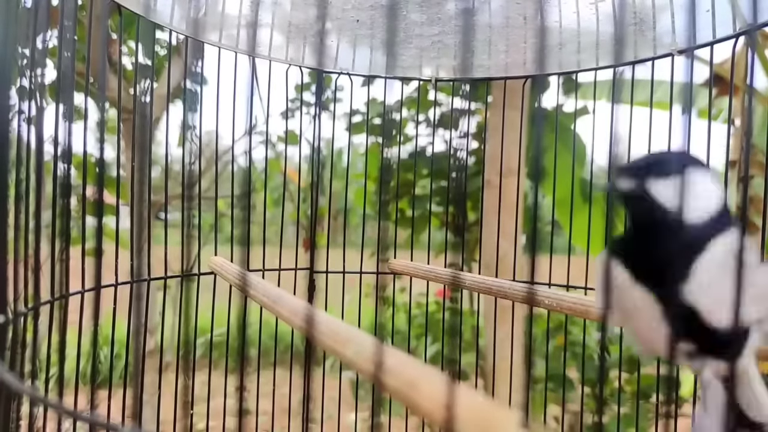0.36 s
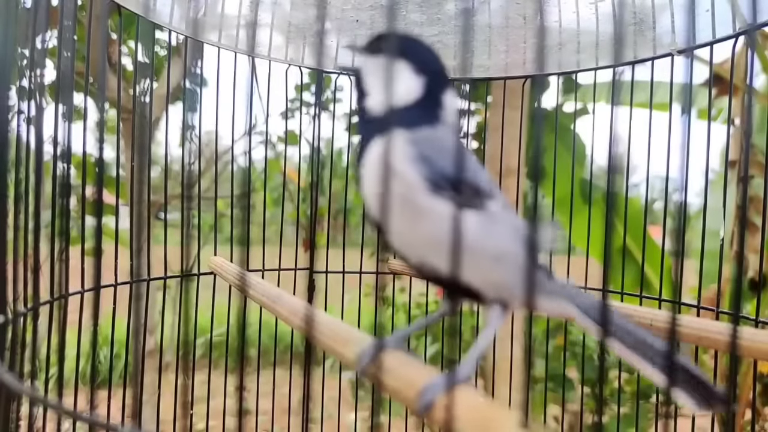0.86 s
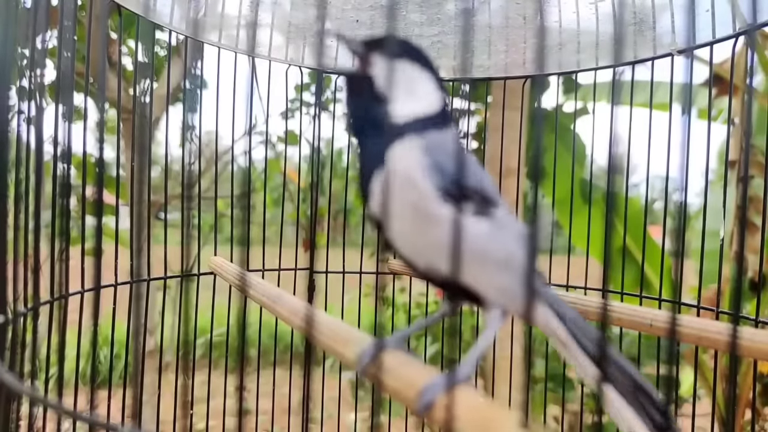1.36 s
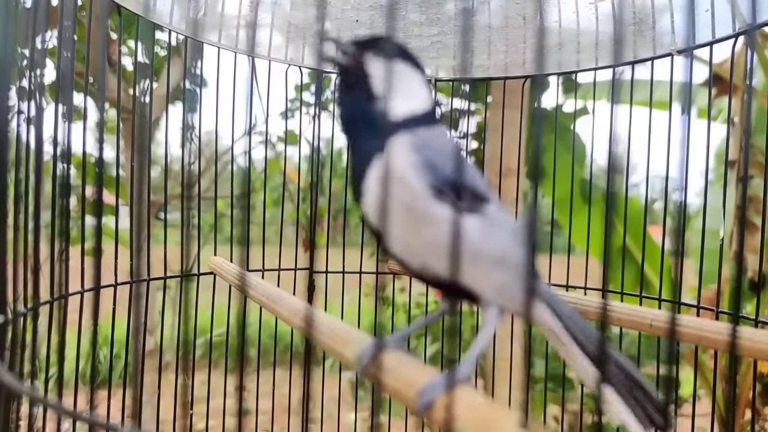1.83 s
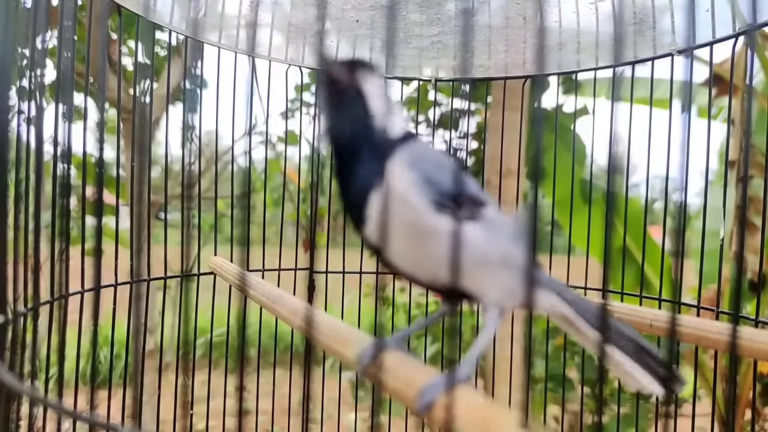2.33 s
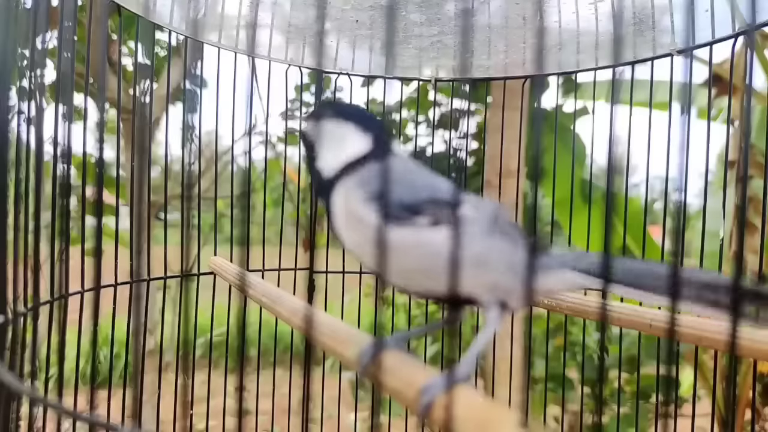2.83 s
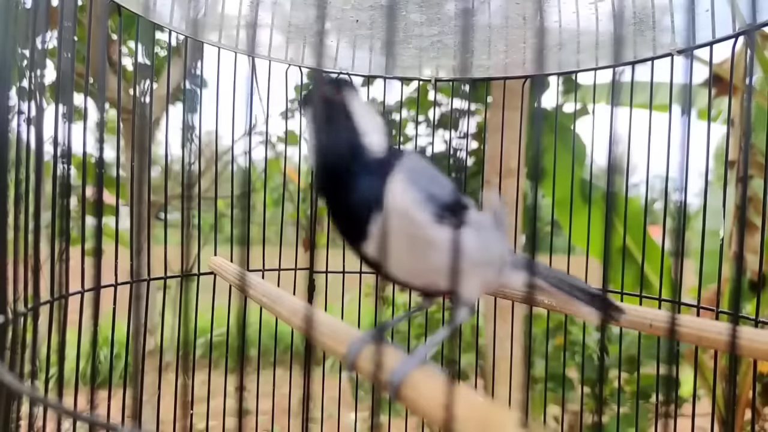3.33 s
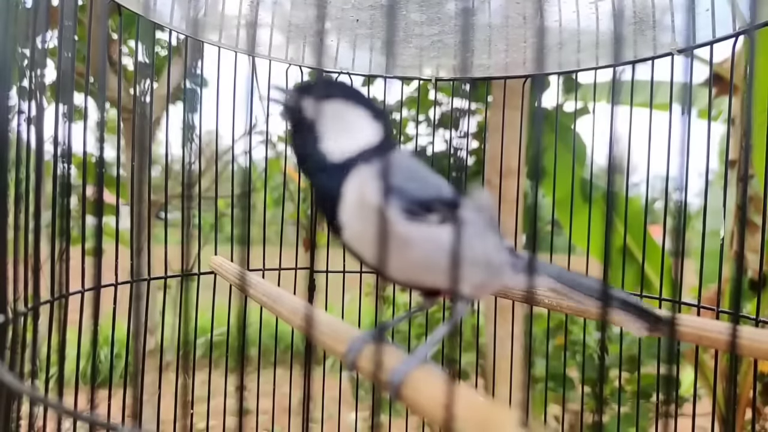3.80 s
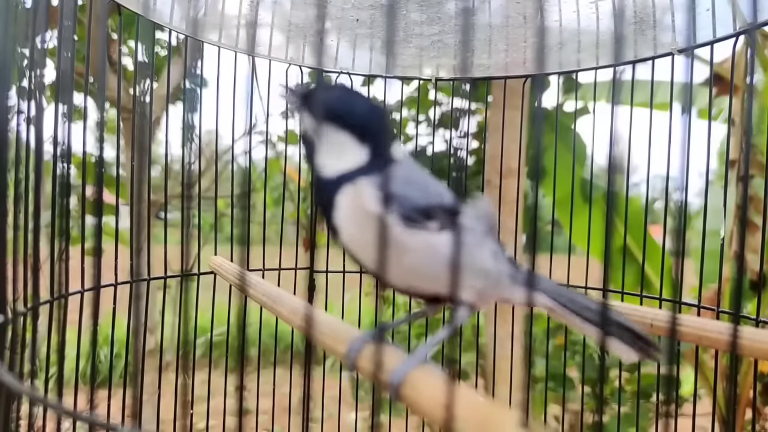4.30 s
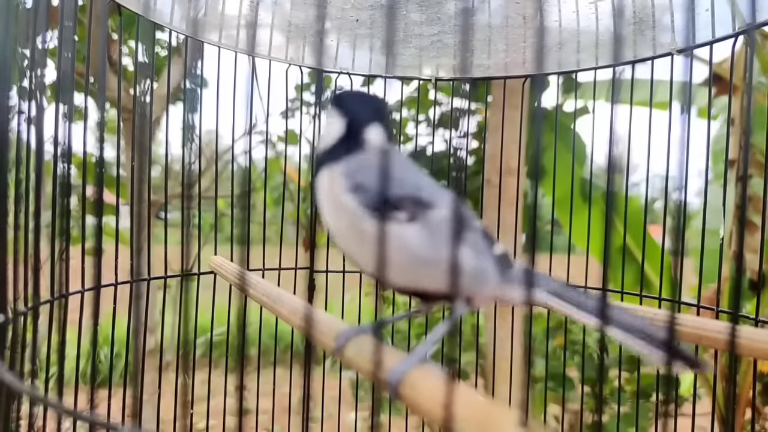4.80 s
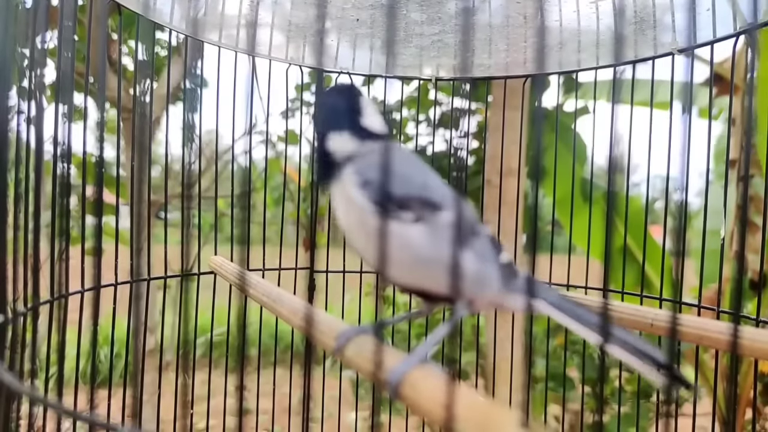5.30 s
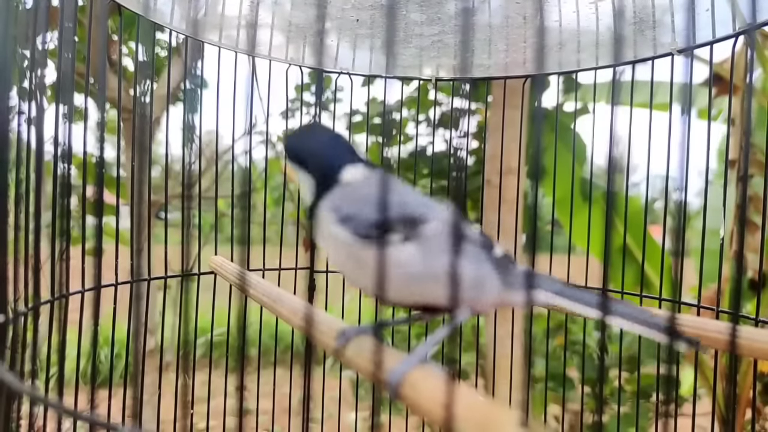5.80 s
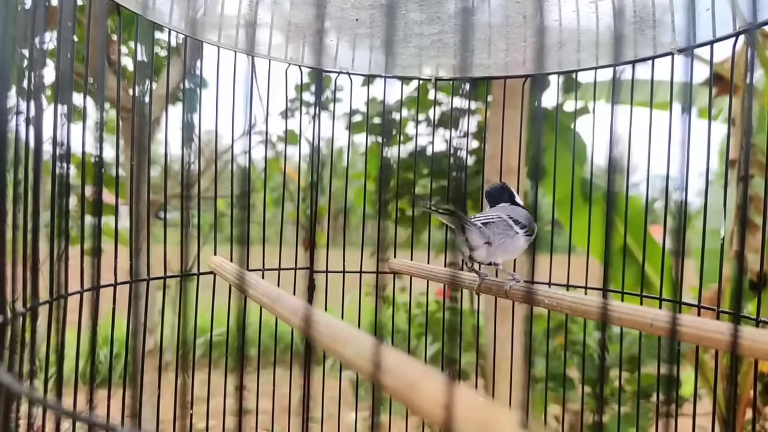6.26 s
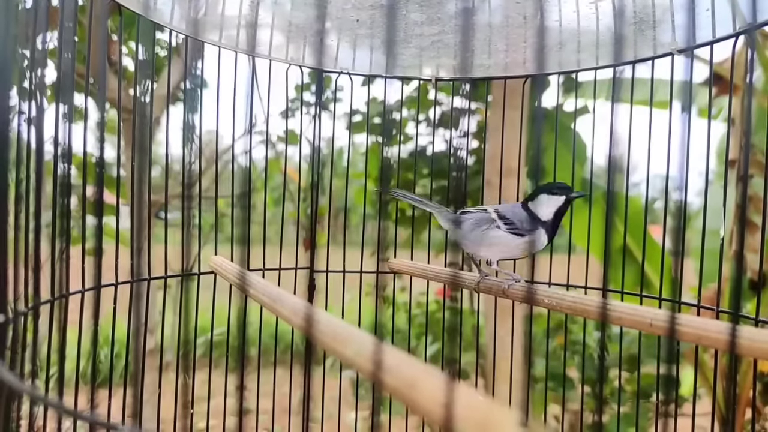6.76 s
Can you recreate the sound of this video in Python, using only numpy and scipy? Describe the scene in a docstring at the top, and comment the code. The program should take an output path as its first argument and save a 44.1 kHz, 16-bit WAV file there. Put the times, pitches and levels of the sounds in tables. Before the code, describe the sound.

A small songbird hops in a wire cage with light knocks and ticking wires, then sings nine evenly spaced phrases, each a long upswept whistle followed by two short, much higher notes. It stops, hops again with a rattle, and a faint distant bird chirps. Outdoors in a garden, close microphone, low wind thumping in gusts.

```python
"""A caged tit in a garden. First it hops and the wire cage rattles, over a wavering low drone that fades.
Then it sings nine phrases, each a long rising whistle and two short high notes: swept sines with weak
overtones; patches of band noise and a thin haze lie over them. Then more hops, and a far bird's gliding chirps.
Throughout, filtered noise makes wind that thumps on the microphone in gusts, and a garden murmur."""
import sys
import numpy as np
from scipy import signal
from scipy.fft import rfft, irfft, next_fast_len
from scipy.io import wavfile
from scipy.ndimage import uniform_filter1d, minimum_filter1d

SR = 44100
rng = np.random.default_rng(int(sys.argv[2]) if len(sys.argv) > 2 else 0)


def generate_wav(signal):
    """Clip the signal to [-1, 1] and save it as 16-bit WAV at the path in sys.argv[1]."""
    frames = np.transpose(np.atleast_2d(signal))
    scaled = np.clip(frames, -1, 1) * 32767
    pcm = np.round(scaled).astype(np.int16)
    wavfile.write(sys.argv[1], SR, pcm)


def volts(x):
    """Linear amplitude factor 10**(x/20) for a level x in dB, scalar or array-like."""
    e = np.asarray(x, float) / 20
    return 10 ** e


N = 314553


def rms_one(x):
    """Scale to rms 1."""
    return x / np.sqrt(np.mean(np.abs(x) ** 2) + 1e-20)


def in_time(rows):
    """Interpolate (time [s], value) rows at every sample."""
    return np.interp(np.arange(N) / SR, *np.transpose(rows))


def drift(rate_hz):
    """Noise through a double one-pole low-pass; rms 1."""
    r = np.exp(-2 * np.pi * rate_hz / SR)
    slow = signal.lfilter([1], [1, -2 * r, r * r], rng.standard_normal(N + SR))
    return rms_one(slow[SR:])


def coloured(spectrum):
    """Steady noise shaped by (frequency [Hz], density [dB per Hz]) rows; rms 1."""
    hz, db = np.transpose(spectrum)
    n = next_fast_len(N, real=True)
    bins_hz = np.arange(1, n // 2 + 2) * SR / n
    gain = volts(np.interp(np.log(bins_hz), np.log(hz), db))
    return rms_one(irfft(rfft(rng.standard_normal(n)) * gain, n)[:N])


def stereo(mid, side):
    """Left and right from mid and side."""
    return np.array([mid + side, mid - side])


# long rising whistles: (dip [s], climb from dip to top [s], mid-climb pitch [Hz],
# opening against the level [dB], level [dB])
RISING_NOTES = [(0.9641, 0.086, 3930, -5.5, -8), (1.4638, 0.09, 3920, 1.6, -7),
                (1.9686, 0.091, 3882, 0.3, -5.5), (2.4688, 0.093, 3864, 0, -6),
                (2.9795, 0.089, 3920, -2, -7), (3.4905, 0.092, 3887, 2.5, -7),
                (3.9897, 0.092, 3994, -1.34, -6.5), (4.5022, 0.097, 3894, -2.5, -6.5),
                (5.0308, 0.098, 3910, -3.5, -7)]
# short high notes: (start [s], first crest [s], held pitch [Hz], opening against the level [dB], level [dB])
HIGH_NOTES = [(1.1459, 1.1673, 6390, -5, -11.5), (1.2775, 1.2952, 6390, -5, -8.5),
              (1.6553, 1.6725, 6387, -3, -10), (1.7777, 1.7963, 6410, -1.5, -7.5),
              (2.1581, 2.18, 6512, -3.5, -8.5), (2.281, 2.3001, 6555, -2.5, -6),
              (2.6671, 2.6871, 6580, -1.5, -7.5), (2.7976, 2.814, 6543, -0.1, -9),
              (3.1699, 3.19, 6388, 0.4, -8), (3.292, 3.31, 6566, -1, -7.5),
              (3.6848, 3.704, 6440, -0.5, -8.5), (3.8059, 3.8234, 6540, -7, -8),
              (4.179, 4.1969, 6500, -4.5, -8), (4.3002, 4.32, 6605, -4, -9),
              (4.6958, 4.7196, 6496, -5.5, -9), (4.8233, 4.843, 6530, -5.5, -10.0),
              (5.2295, 5.2491, 6505, -4, -11), (5.3611, 5.3764, 6400, -5, -14)]
# rising whistle pattern: (time from the dip [s], pitch before tuning [Hz], swell [dB])
RISING_SHAPE = [(-.044, 2974, -31), (-.036, 3358, -8.5), (-.030, 3582, -3), (-.0245, 3797, -0.5),
                (-.018, 3593, 1.5), (-.008, 3050, -4.5), (.002, 2799, -10.5), (.012, 2919, -8),
                (0.029, 3534, -4.5), (.050, 3894, 0), (0.071, 4283, 1), (.081, 4620, -.5), (.092, 5268, -1),
                (.105, 4666, -1), (.116, 4174, -1), (0.124, 4081, -14.5), (0.128, 4064, -34)]
# high note pattern: (time from the first crest [s], pitch before tuning [Hz], swell [dB])
HIGH_SHAPE = [(-.0215, 6215, -37.5), (-.020, 6250, -14.5), (-.017, 6760, -2.5), (-.012, 6862, 1.5),
              (-.005, 7827, -1.5), (0, 8227, -6), (.003, 7635, -6), (.007, 6594, 3.5), (0.0094, 6194, -1.5),
              (.020, 6287, 1.5), (.028, 6730, 0), (0.036, 7050, 0.5), (.039, 6924, -0.5), (0.046, 5940, 0),
              (0.0478, 5445, -11), (0.0498, 4782, -30.5), (.051, 4380, -49.5)]


def song_controls():
    """Pitch [Hz] and amplitude per sample: each note stretches, tunes and weights the pattern of its kind."""
    pattern_climb_s, pattern_climb_hz = 0.092, 3910
    pattern_lead_s, pattern_held_hz = 0.020, 6460
    rising_opening_fades_s, high_opening_fades_s = (-0.015, 0.022), (0.0012, 0.012)  # from, to, in the pattern
    crest_sag_hz_per_s = 140  # the tiring bird reaches its first crest less high
    hz, height = np.zeros(N), np.zeros(N)

    def sing(at, stage, shape, tune, opening_db, fades_s, level_db, lift_hz=0):
        """Write one note; stage is the time in its pattern."""
        when, pitch, swell_db = np.transpose(shape)
        hz[at] = tune * np.interp(stage, when, pitch) + lift_hz
        opening = opening_db * np.interp(stage, fades_s, [1, 0])
        db = level_db + np.interp(stage, when, swell_db) + opening
        sounding = (stage > when[0]) * (stage < when[-1])
        height[at] = sounding * np.sqrt(2) * volts(db)

    for dip, climb, pitch, opening_db, level_db in RISING_NOTES:
        at = np.arange(int((dip - 0.055) * SR), int((dip + 0.14) * SR))
        t = at / SR - dip
        stage = np.where(t < 0, t, t * pattern_climb_s / climb)
        tune = pitch / pattern_climb_hz
        sing(at, stage, RISING_SHAPE, tune, opening_db, rising_opening_fades_s, level_db)

    middle = np.mean(HIGH_NOTES, axis=0)[1]  # mean crest time
    for start, crest, pitch, opening_db, level_db in HIGH_NOTES:
        at = np.arange(int((crest - 0.035) * SR), int((crest + 0.06) * SR))
        t = at / SR - crest
        stage = np.where(t < 0, t * pattern_lead_s / (crest - start), t)
        tune = pitch / pattern_held_hz
        lift_hz = crest_sag_hz_per_s * (middle - crest) * np.exp(-(stage / 0.014) ** 2)
        sing(at, stage, HIGH_SHAPE, tune, opening_db, high_opening_fades_s, level_db, lift_hz)
    return uniform_filter1d(hz, size=100), uniform_filter1d(height, size=50)


def tit(hz, high, facing):
    """A near-pure whistle of unit height: a swept sine with weak, wavering overtones."""
    high_from_hz = 5800
    second_db, third_db, fourth_db, high_second_db = -39, -40.5, -55.5, -33
    flutter_db = 0.7
    phase = 2 * np.pi * np.cumsum(hz) / SR
    low_overtones = volts(second_db + 5.1 * drift(29)) * np.sin(2 * phase)
    low_overtones += volts(third_db + 2.1 * drift(25)) * np.sin(3 * phase)
    low_overtones += volts(fourth_db) * np.sin(4 * phase) * (hz < SR / 10)  # no aliasing
    high_overtone = (hz > high_from_hz) * volts(high_second_db) * np.sin(2 * phase)
    overtones = (1 - high) * low_overtones + high_overtone
    fundamental = volts(flutter_db * drift(63)) * np.sin(phase)
    return fundamental + facing * volts(4.3 * drift(6.4)) * overtones


# band noise in place of part of the whistle: (start [s], length [s], share of power [0-1])
NOISE_PATCHES = [(1.557, .034, .75), (1.659, 0.03, .55), (1.705, .034, .6), (1.826, 0.018, .4),
                 (2.170, 0.023, .4), (2.683, 0.02, .2), (2.816, 0.021, .15), (3.064, 0.035, 0.67),
                 (3.296, 0.027, .35), (3.584, .036, 0.5), (4.172, 0.02, .8), (4.302, 0.028, .9),
                 (4.874, 0.029, .1), (5.239, 0.023, .35), (5.288, 0.024, .5), (5.415, 0.026, .6)]


def noise_patches(hz, height):
    """Short patches of band noise replace part of the whistle; gives the tone gain left, and mid and side noise."""
    left, noise = np.ones(N), np.zeros((2, N))
    for s, length, share in NOISE_PATCHES:
        i, n = int(s * SR), int(length * SR)
        fade = signal.windows.tukey(n, 0.4)
        local = height[i:i + n]
        passed = hz[i:i + n][local > local.max() / 3]
        band = signal.butter(6, [passed.min(), passed.max()], "band", fs=SR, output="sos")
        patch = signal.sosfilt(band, rng.standard_normal((2, 4096)))
        patch = rms_one(patch[:, 1024:])[:, :n]
        held_down = patch / (0.2 + np.abs(signal.hilbert(patch))) ** 0.6  # limits the peaks
        patch = rms_one(signal.sosfilt(band, held_down))
        left[i:i + n] = np.sqrt(1 - share * fade ** 2)
        power = share * (0.1 * np.mean(local ** 2) + 0.26 * local ** 2)
        noise[:, i:i + n] = fade * patch * np.sqrt(power)
    return left, noise


# haze during the low notes: (frequency [Hz], density [dB per Hz])
LOW_HAZE = [(300, -8), (1000, -8.5), (2000, -10), (3000, -1.5), (4500, -5), (5500, -6.5), (6500, -12),
            (9000, -0.5), (14000, -3.5), (14800, -21)]
# haze during the high notes: (frequency [Hz], density [dB per Hz])
HIGH_HAZE = [(400, -22.5), (2000, -30), (4500, -21), (5500, -14), (8300, -15.5), (9200, -36), (11000, -25),
             (12200, -6.5), (14200, -0.5), (14800, -21)]


def haze(height, high, facing):
    """Thin coloured noise that follows the whistle's strength; each call is an independent draw."""
    low_db, high_db = -43, -35.5
    high_swell = uniform_filter1d(height * high, size=700, origin=300)
    low_swell = uniform_filter1d(height * (1 - high), size=1100)
    high_part = high_swell * facing * volts(high_db) * coloured(HIGH_HAZE)
    return high_part + low_swell * volts(low_db + 4.8 * drift(20)) * coloured(LOW_HAZE)


# the head turns to and from the microphone: (time [s], gain of overtones and high-note haze [dB])
FACING = [(1.2, 4.5), (1.75, 4.5), (2.25, 1.5), (2.75, 2.5), (3.25, 0), (3.75, 0.5), (4.25, 6.5),
          (4.75, 0.5), (5.3, 5)]


def song():
    """The whistle with its noise patches and haze; mid, side."""
    high_from_hz, patch_side_db, haze_side_db = 5800, -1.5, -7
    hz, height = song_controls()
    highest_near = -minimum_filter1d(-hz, size=1800)
    high = 1.0 * (highest_near > high_from_hz)
    facing = volts(in_time(FACING))
    left, (patches, patches_side) = noise_patches(hz, height)
    treble = signal.butter(4, 3500, "high", fs=SR, output="sos")
    mid = height * left * tit(hz, high, facing) + patches + haze(height, high, facing)
    haze_side = signal.sosfilt(treble, haze(height, high, facing))
    return mid, volts(patch_side_db) * patches_side + volts(haze_side_db) * haze_side


# puff spectrum: (frequency [Hz], density [dB per Hz])
PUFF_COLOUR = [(1000, -24), (3000, -7.5), (4500, -3), (6000, -3), (8000, -16), (14000, -28)]


def onset_puffs():
    """A short scratch of air just before each rising whistle takes hold: bell-shaped noise bursts."""
    puff_db, puff_s = -43, 0.006
    t = np.arange(N) / SR
    shape = sum(np.exp(-((t - note[0] + 0.045) / puff_s) ** 2) for note in RISING_NOTES)
    return volts(puff_db) * shape * coloured(PUFF_COLOUR)


# landings on the perch: (time [s], body drive [dB], wire drive [dB])
HOPS = [(0.185, -46.5, -51.5), (0.552, -54, -49.5), (.609, -77, -71), (0.777, -63, -72), (5.65, -62, -57.5),
        (6.19, -68, -63), (6.292, -44, -46.5), (6.67, -54, -70)]
# cage resonances: (frequency [Hz], relative level [dB], t60 [s])
CAGE = [(460, 2, 0.0494), (581, 0, 0.055), (920, -6, 0.067), (1357, -1, 0.043), (1690, -6.5, 0.043),
        (2390, -23, 0.015), (2900, -8, 0.015), (4200, -11, 0.012), (6400, -7, 0.027), (6930, -12, 0.028),
        (7700, -10, .02), (10040, -8, .025), (12700, -12, .02)]


def cage():
    """A landing drives resonators: scuff, knock, wires ticking at once, perch and tray swelling up for longer."""
    rattle_s, rattle_per_s, wires_from_hz = 0.026, 6000, 3500
    knock_db = 15  # first firm blow of the feet, over the wire drive
    rustle_db = 6
    t, out = np.arange(N) / SR, np.zeros(N)
    clicks = (rng.random(N) < rattle_per_s / SR) * volts(3.68 * np.minimum(rng.exponential(1, N), 4))
    clicks = clicks * rng.choice([-1, 1], N)
    body, wires, knocks = np.zeros((3, N))
    for s, body_db, wire_db in HOPS:
        since = (t - s + 0.002).clip(0, None)
        body_swell = (1 - np.exp(-since / 0.025)) * np.exp(-since / (2.2 * rattle_s))
        body += volts(body_db) * clicks * body_swell
        knocks[int((s + 0.002) * SR)] = volts(wire_db + knock_db)
        ticking = (since > 0) * np.exp(-(since / rattle_s) ** 2)
        scuff = 0.28 * (np.abs(t - s + 0.006) < 0.006)
        wires += volts(wire_db) * clicks * (ticking + scuff)
    for hz, db, t60 in CAGE:
        r, w = volts(-60 / (t60 * SR)), 2 * np.pi * hz / SR
        blows = knocks + (wires if hz > wires_from_hz else body)
        ring = signal.lfilter([0, np.sin(w)], [1, -2 * r * np.cos(w), r * r], blows + 1e-18)
        out += volts(db - 21.5) * ring
    dull = signal.lfilter([0.085], [1, -1.56, 0.61], body)  # low-pass near 2 kHz
    return out + volts(rustle_db) * (dull + 0.36 * wires)


# far bird: (start [s], length [s], from [Hz], to [Hz], level before flutter [dB])
FAR_CHIRPS = [(6.364, 0.082, 3900, 5000, -61), (6.517, 0.072, 3600, 3900, -61),
              (6.77, 0.051, 3650, 3610, -63), (6.813, 0.03, 4200, 4370, -60.5)]


def far_bird():
    """Faint gliding whistles, their level fluttering, blurred by distance."""
    out = np.zeros(N)
    for s, length, from_hz, to_hz, db in FAR_CHIRPS:
        n, i = int(length * SR), int(s * SR)
        phase = 2 * np.pi * np.cumsum(np.linspace(from_hz, to_hz, n)) / SR
        out[i:i + n] += volts(db) * np.hanning(n) ** 0.5 * np.sin(phase)
    return out * (0.5 + 0.74 * drift(193))


def echo(x):
    """Cage, eaves and leaves scatter a short dense tail: decaying noise, thinner in the lows."""
    echo_db, t60_s, thin_below_hz = -27.5, 0.105, 4440
    t = np.arange(SR // 4) / SR
    tail = rng.standard_normal(len(t)) * volts(-60 * t / t60_s) * np.minimum(t / 0.004, 1)
    tail = tail / np.sqrt(np.sum(tail ** 2))
    tail = signal.lfilter(*signal.butter(2, thin_below_hz, "high", fs=SR), tail)
    return volts(echo_db) * signal.oaconvolve(x, tail)[:N]


# steady breeze: (time [s], level [dB])
WIND = [(0, -62), (.2, -53.5), (1.15, -48), (1.35, -48), (2.3, -48.5), (2.75, -38.5), (3.1, -35.5),
        (4.0, -39), (5.2, -38.5), (5.8, -41.5), (6.3, -38), (7.13, -48)]
# gusts on top of the breeze: (time [s], level [dB])
GUSTS = [(0.649, -68), (1.291, -41), (1.45, -45.5), (1.768, -42.5), (2.242, -54), (2.52, -46), (2.93, -28),
         (3.35, -44.5), (3.481, -31.5), (3.82, -34.5), (4.271, -33), (4.48, -30.5), (4.841, -40),
         (5.07, -32), (5.64, -42), (6.07, -48.5), (6.29, -47), (6.86, -33), (7.12, -35.5)]
# wind spectrum: (frequency [Hz], density [dB per Hz])
WIND_COLOUR = [(12, -27), (20, 2.5), (32, 2.5), (46, -2.5), (91, -17.5), (211, -29), (300, -36.5),
               (390, -66.5), (660, -120)]


def wind():
    """Low noise under a wavering breeze level plus short bell-shaped gusts; mid, side."""
    gust_s, side_db = 0.05, -34.5
    t = np.arange(N) / SR
    gusts = sum(volts(db) * np.exp(-((t - s) / gust_s) ** 2) for s, db in GUSTS)
    level = (volts(in_time(WIND)) + gusts) * volts(1.2 * drift(9.8))
    return level * coloured(WIND_COLOUR), volts(side_db) * level * coloured(WIND_COLOUR)


# murmur: (time [s], level [dB])
MURMUR = [(0, -66.5), (.4, -60.5), (2.1, -62), (3.7, -58), (4.4, -55), (5.1, -59.5), (6, -62), (6.35, -58),
          (7.13, -61)]
# garden spectrum: (frequency [Hz], density [dB per Hz])
GARDEN = [(100, -23), (160, -3), (370, -10.5), (570, -11), (1100, -20.5), (1800, -24.5), (3300, -29.5),
          (5000, -34), (8000, -36), (13800, -42), (15500, -70)]


def garden():
    """Broad murmur: coloured noise whose level wavers; mid, side."""
    side_db = -17
    level = volts(in_time(MURMUR) + 1.6 * drift(6) + 0.7 * drift(30))
    return level * coloured(GARDEN), volts(side_db) * level * coloured(GARDEN)


# drone: (time [s], level [dB])
DRONE = [(0, -65), (1, -62.5), (2.1, -67.5), (2.4, -78), (7.13, -78.5)]
# drone spectrum: (frequency [Hz], density [dB per Hz])
DRONE_COLOUR = [(150, -51.5), (225, -14), (260, 6), (300, -8.5), (420, -51.5)]


def drone():
    """A faint low drone that wavers and fades away: narrow-band noise."""
    return volts(in_time(DRONE) + 3.1 * drift(6.1)) * coloured(DRONE_COLOUR)


def scene():
    """Bird, cage and background, all close to the middle."""
    echo_side_db = -10.5
    voice, voice_side = song()
    near = voice + onset_puffs() + cage() + far_bird()
    wind_mid, wind_side = wind()
    garden_mid, garden_side = garden()
    mid = near + echo(near) + wind_mid + garden_mid + drone()
    side = voice_side + volts(echo_side_db) * echo(near) + garden_side + wind_side
    return stereo(mid, side)


def roll_off(x):
    """The treble ends steeply here."""
    return signal.sosfilt(signal.butter(12, 15610, fs=SR, output="sos"), x)


def record(dry):
    """Round the highest peaks and cut the top."""
    cutoff_hz = 15200
    rounded = dry / (1 + np.abs(dry) ** 8) ** (1 / 8)
    low_pass = signal.cheby2(12, 45, cutoff_hz, fs=SR, output="sos")
    mix = signal.sosfilt(low_pass, rounded)
    return roll_off(mix)


dry = scene()
out = record(dry)
generate_wav(out)
```